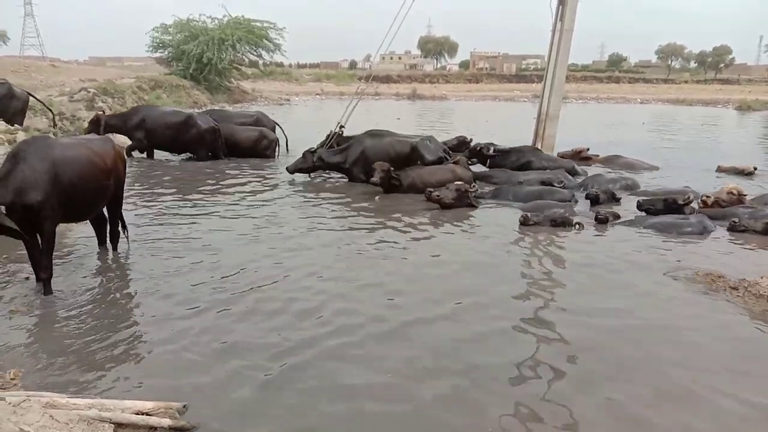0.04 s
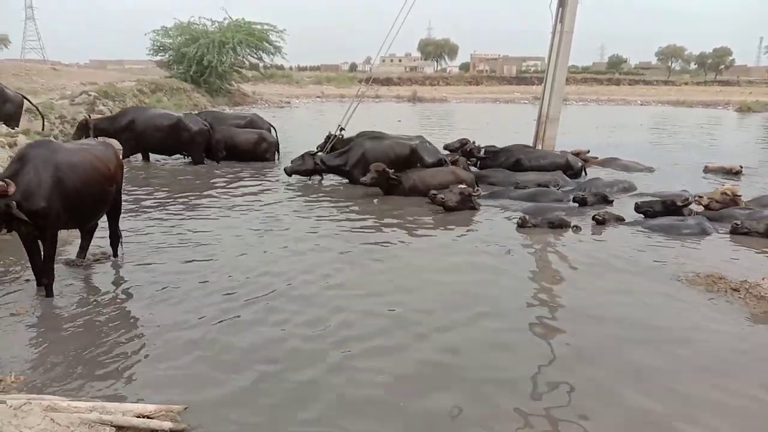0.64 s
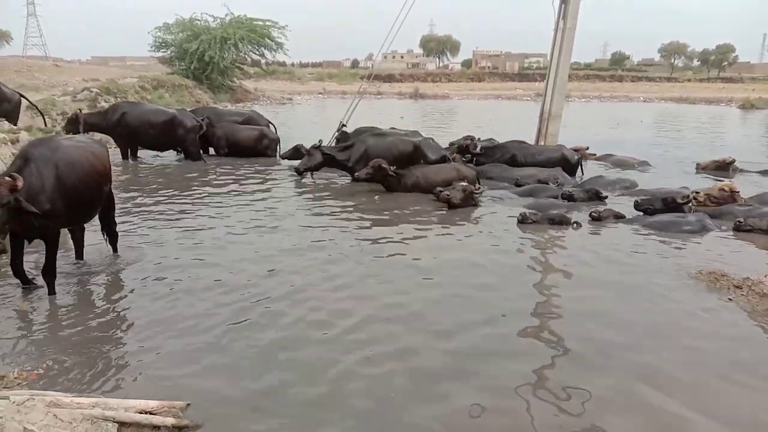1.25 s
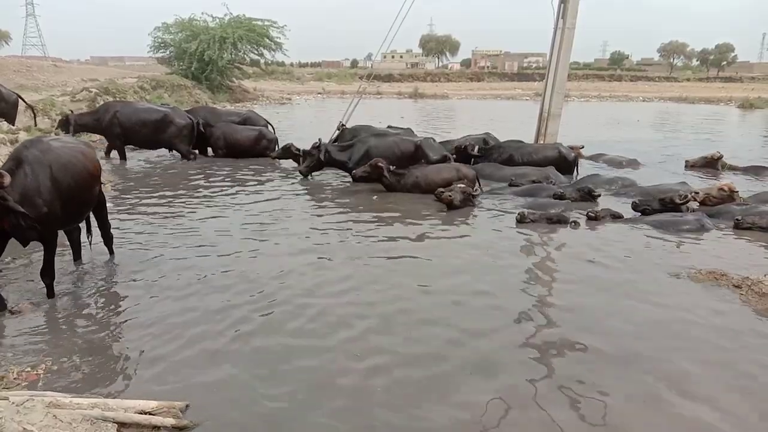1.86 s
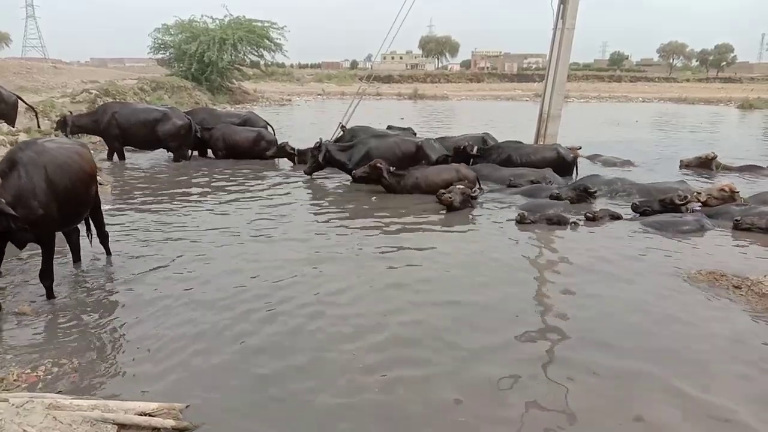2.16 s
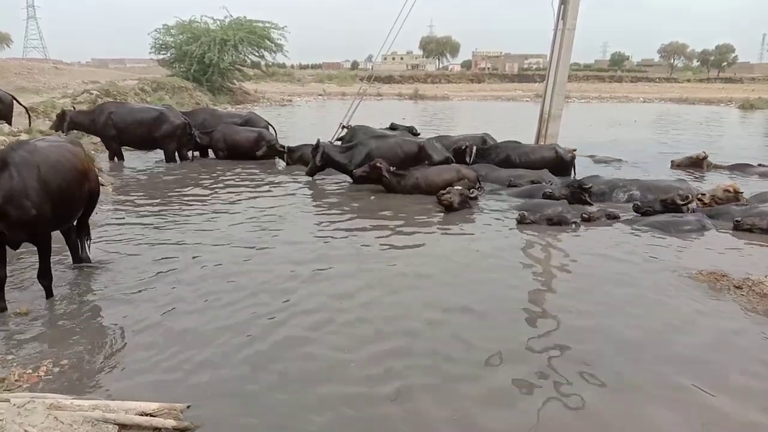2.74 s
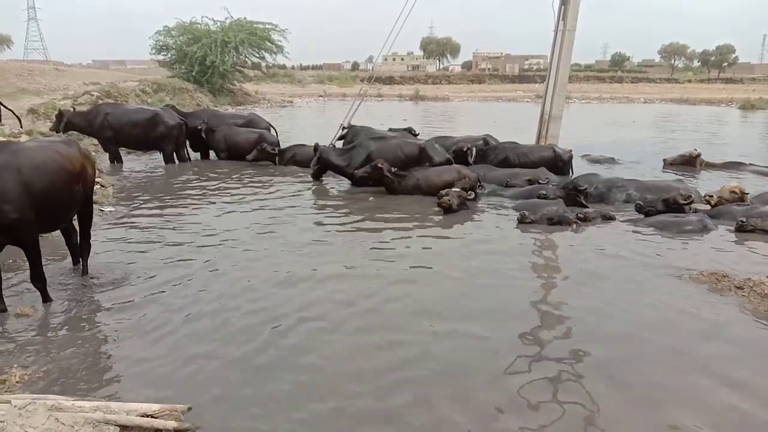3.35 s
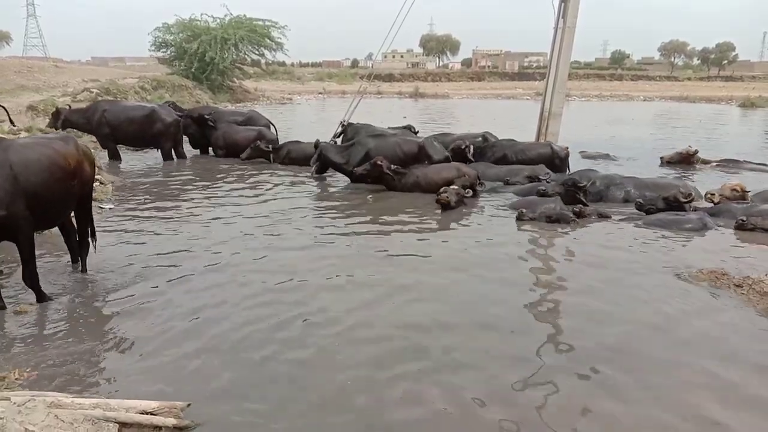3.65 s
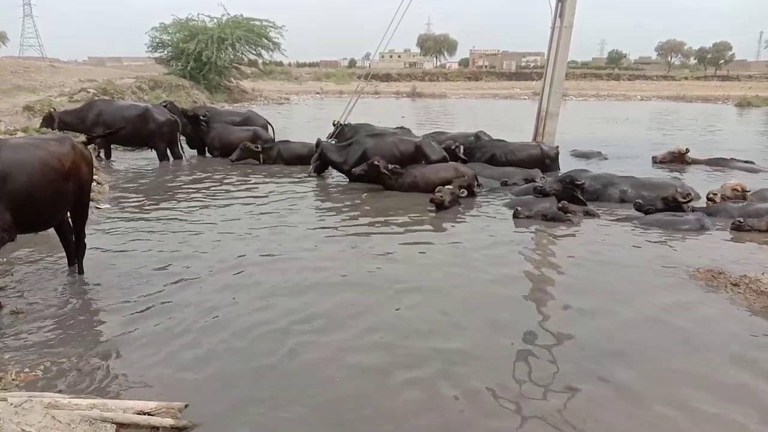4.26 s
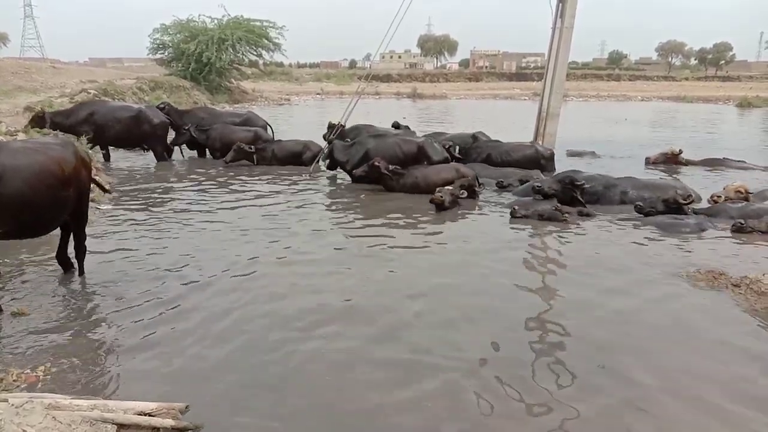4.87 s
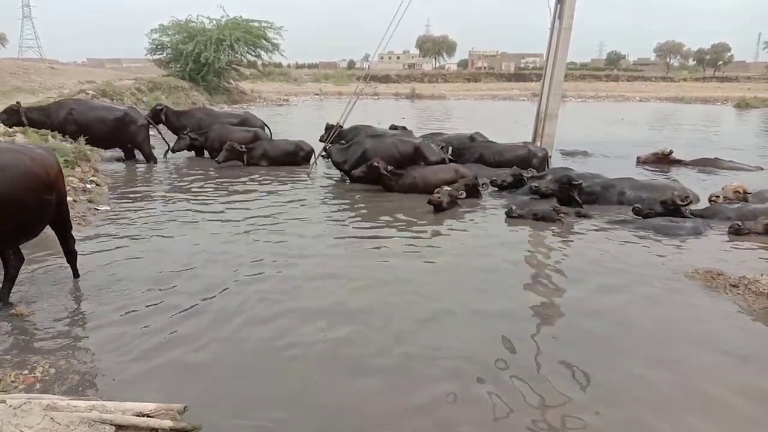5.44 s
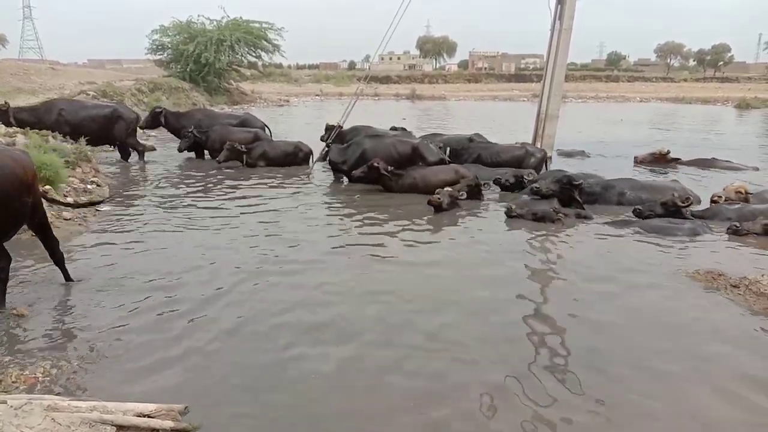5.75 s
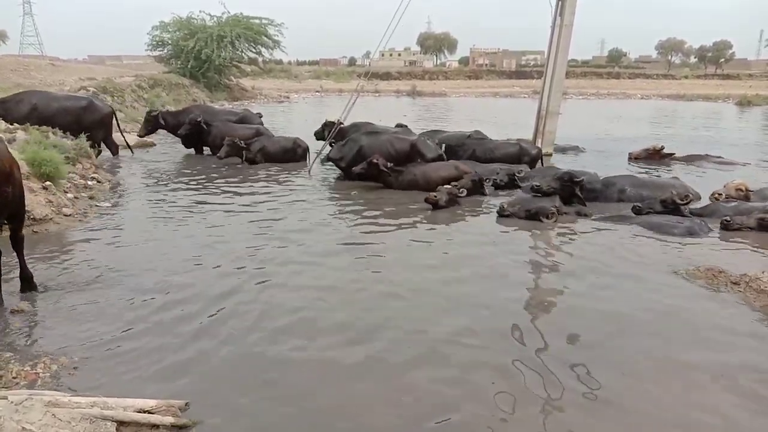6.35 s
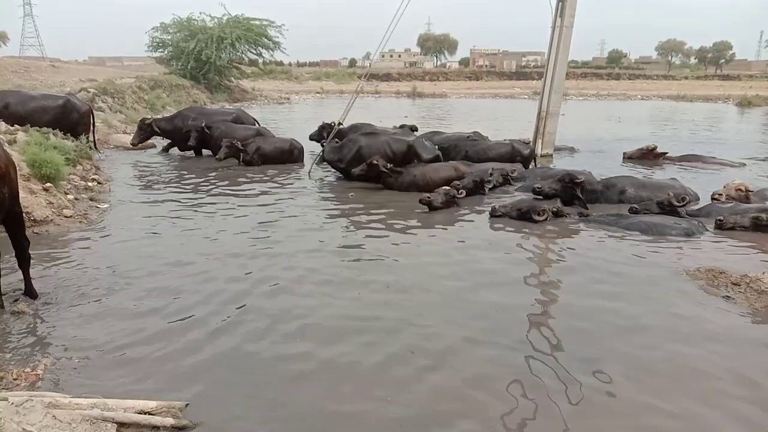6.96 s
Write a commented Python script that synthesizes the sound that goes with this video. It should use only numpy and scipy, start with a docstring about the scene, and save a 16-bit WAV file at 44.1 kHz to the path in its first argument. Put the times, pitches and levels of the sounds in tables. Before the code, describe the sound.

Buffaloes wade in a muddy pond outdoors, their legs making light, irregular sloshes, slaps and bubbly plops, with thrown drops fizzing back, for the whole seven seconds. A bird gives a rising whistle at the very start and again at about 3.1 and 4.7 seconds. Another small bird repeats a quick, high ticking phrase three or four times a second, steadily from about 1.2 seconds to the end. Wind puffs on the microphone at 0.3 seconds, then a long rumbling gust runs from 2.3 to 4.1 seconds, with the loudest low thumps around 3 seconds. A far crow caws once, faintly, at about 3.2 seconds. A sharp splash and plop comes at 4.6 seconds, with a weaker gust just after. From 5 seconds the sloshing gets busier, with deeper plops and only slight wind puffs. The sound is almost mono.

```python
"""Buffaloes wading in a muddy pond.

Legs slosh, slap and plop: large bubbles gurgle, thrown drops fizz. Gusts buffet the microphone.
One small bird repeats a quick ticking phrase, another gives rising whistles, a far crow caws once.
The microphone's port rings near 1250 Hz; the sound is almost mono."""
import sys
import numpy as np
from scipy import signal
from scipy.fft import rfft, irfft, next_fast_len
from scipy.io import wavfile
from scipy.ndimage import uniform_filter1d

SR = 44100
rng = np.random.default_rng(int(sys.argv[2]) if len(sys.argv) > 2 else 0)


def wrap_up_sound(samples):
    """Save the sound to the file named by the first command line argument, as 16-bit audio."""
    columns = np.atleast_2d(samples).T
    # keep every value between -1 and 1, then stretch to whole-number steps
    tamed = np.clip(columns, -1, 1)
    steps = np.round(tamed * 32767).astype(np.int16)
    wavfile.write(sys.argv[1], SR, steps)


N = 313551
TIME_S = np.arange(N) / SR
COARSE_S = TIME_S[::32]  # clock for slow envelopes


def amp(db):
    """Decibels to gain."""
    return 10 ** (np.asarray(db) / 20)


def unit(x):
    """Scale to rms 1."""
    return x / np.sqrt(np.mean(x ** 2) + 1e-20)


def gain_at(spectrum, hz):
    """Gain from (Hz, dB) points joined on a log-frequency axis."""
    points_hz, db = np.transpose(spectrum)
    return amp(np.interp(np.log(hz + 1), np.log(points_hz + 1), db))


def add(mix, start_s, sound):
    """Mix a sound in at start_s."""
    start = round(start_s * SR)
    sound = sound[max(-start, 0):]
    part = mix[max(start, 0):][:len(sound)]
    part += sound[:len(part)]


def colour(x, spectrum, size=4096):
    """Minimum-phase filter from (Hz, dB) points."""
    log_gain = np.log(gain_at(spectrum, abs(np.fft.fftfreq(size, 1 / SR))))
    taps = np.fft.ifft(np.exp(np.conj(signal.hilbert(log_gain)))).real
    return signal.oaconvolve(x, taps[:size // 2])[:len(x)]


def band_rms(x, lo_hz, hi_hz):
    """Rms within one band."""
    return np.std(signal.sosfilt(signal.butter(3, [lo_hz, hi_hz], "band", fs=SR, output="sos"), x))


def wander(rate_hz, count=N):
    """Smooth noise of rms about 1, rolling off above rate_hz."""
    size = next_fast_len(N, True)
    lowpass = np.exp(-(np.fft.rfftfreq(size, 1 / SR) / rate_hz) ** 2)
    return unit(irfft(rfft(rng.standard_normal(size)) * lowpass, size))[:count]


def patchy(x, depth_db, span_s, span_hz):
    """Random gain patches in time and frequency."""
    spectrogram = signal.stft(x, nperseg=512, noverlap=384)[2]
    patches = rng.standard_normal(spectrogram.shape)
    for axis, span in enumerate([span_hz * 512 / SR, span_s * SR / 128]):
        kernel = np.hanning(max(round(2 * span), 3))
        patches = signal.fftconvolve(patches, np.expand_dims(kernel, 1 - axis), "same")
    return signal.istft(spectrogram * amp(depth_db * unit(patches)), nperseg=512, noverlap=384)[1][:N]


def surge(peak_s, rise_s, fall_s):
    """Coarse envelope, 10 dB down at rise_s before and fall_s after its peak."""
    t = COARSE_S - peak_s
    return amp(-10 * np.where(t < 0, (t / rise_s) ** 2, t / fall_s).clip(0, 20))


def power_sum(floor_db, surges):
    """Audio-rate envelope of overlapping surges on a steady floor."""
    return np.interp(TIME_S, COARSE_S, np.sqrt(amp(floor_db) ** 2 + np.sum(np.square(surges), axis=0)))


def scatter(x, t60_s, wet_db):
    """Add sparse echoes off the banks, herd and bushes."""
    t = np.arange(SR // 2) / SR
    taps = rng.standard_normal(len(t)) * (rng.random(len(t)) < 1500 / SR)  # 1500 echoes a second
    taps *= (t > .005) * np.exp(-np.log(1000) * t / t60_s)
    return x + amp(wet_db) * signal.oaconvolve(x, taps / np.linalg.norm(taps))[:N]


def hiss():
    """Each channel's own faint noise."""
    # Each row: frequency in Hz, gain in dB.
    spectrum = [(30, -68.5), (100, -64), (300, -64.5), (1200, -69), (5000, -73.5), (15000, -69.5)]
    return np.array([colour(noise, spectrum) for noise in rng.standard_normal((2, N))])


def air():
    """Faint wash of open country."""
    # Each row: frequency in Hz, relative level in dB.
    spectrum = [(30, -6), (100, 6), (300, 1), (550, -23.5), (900, -10), (2000, -4.5), (3000, -19),
                (4200, -18), (5000, 2.5), (6500, -15), (10000, -9), (15000, -8)]
    wash = patchy(colour(rng.standard_normal(N), spectrum), depth_db=1.6, span_s=.05, span_hz=400)
    return amp(-63.5) * unit(wash)


def crow():
    """One hoarse harmonic caw; the pitch arches and drops."""
    # Each row: time in seconds, pitch in Hz, level in dB.
    caw = [(3.13, 587, -86), (3.169, 599, -59), (3.20, 620, -52), (3.249, 595, -53), (3.278, 569, -56),
           (3.32, 506, -58), (3.35, 487, -68)]
    # Each row: frequency in Hz, gain in dB.
    throat = [(550, -36), (1150, -0.5), (1850, 1.5), (2400, 3), (3000, -43), (4000, -37)]
    times_s, hz, db = np.transpose(caw)
    pitch_hz = np.interp(TIME_S, times_s, hz)
    phase = 2 * np.pi * np.cumsum(pitch_hz * (1 + .04 * wander(260))) / SR
    voice = sum(gain_at(throat, k * pitch_hz) * np.sin(k * phase) * (1 + .5 * wander(130))
                for k in range(1, 7))
    return voice * amp(np.interp(TIME_S, times_s, db)) * (TIME_S > times_s[0]) * (TIME_S < times_s[-1])


def whistle(times_s, hz, db):
    """Quivering pure tone along a pitch and level path."""
    t = np.arange(times_s[0], times_s[-1], 1 / SR)
    pitch_hz = np.interp(t, times_s, hz) * (1 + .0055 * wander(300, count=len(t)))
    envelope = amp(np.interp(t, times_s, db)) * signal.windows.tukey(len(t), .05)
    return envelope * np.sin(2 * np.pi * np.cumsum(pitch_hz) / SR)


def note(length_s, start_hz, end_hz):
    """Short, slightly raspy glide."""
    pitch_hz = np.linspace(start_hz, end_hz, int(length_s * SR))
    rasp = .018 * unit(uniform_filter1d(rng.standard_normal(SR // 8), 50))[:len(pitch_hz)]
    return np.sin(2 * np.pi * np.cumsum(pitch_hz * (1 + rasp)) / SR) * np.hanning(len(pitch_hz))


def bird_calls(echo_s=.075, echo_db=-21):
    """Rising whistles echoed by the far bank, one thin call and stray chirps."""
    # Each row: top of the sweep in seconds, level in dB, time stretch.
    whistles = [(.113, -40.5, 0.94), (3.111, -42, 1.0), (4.753, -41, 1.02)]
    # Each row: offset from the top in seconds, pitch in Hz, relative level in dB.
    upsweep = [(-.15, 3090, -17), (-.128, 3730, -2), (-.108, 4220, -1.5), (-.075, 4380, -1.5),
               (-.04, 4600, 5.5), (-.02, 4980, 7), (-.004, 5550, 5.5), (.004, 5760, -22.5)]
    # Each row: time in seconds, pitch in Hz, level in dB.
    thin_call = [(2.576, 5970, -48), (2.590, 7160, -44), (2.601, 7170, -41.5), (2.615, 6820, -48),
                 (2.635, 6450, -44.5), (2.655, 6540, -61)]
    # Each row: start and length in seconds, start and end pitch in Hz, level in dB.
    chirps = [(0.43, 0.053, 7000, 6950, -67), (0.81, 0.066, 7370, 7380, -49),
              (1.028, .045, 7400, 7250, -66), (1.166, 0.045, 7100, 6840, -66),
              (1.405, 0.098, 7100, 7100, -61), (1.718, 0.091, 6980, 7000, -62),
              (2.331, 0.046, 7340, 7050, -63), (2.886, 0.038, 5000, 5460, -44.5),
              (2.909, 0.039, 4330, 4970, -43.5), (4.523, 0.031, 4960, 5550, -46),
              (4.55, 0.034, 4150, 5170, -42.5)]
    out = np.zeros(N)
    offsets_s, hz, shape_db = np.transpose(upsweep)
    for top_s, db, stretch in whistles:
        times_s = top_s + offsets_s * stretch
        call = whistle(times_s, hz, db + shape_db)
        add(out, times_s[0], call)
        add(out, times_s[0] + echo_s, amp(echo_db) * call)
    add(out, thin_call[0][0], whistle(*np.transpose(thin_call)))
    for start_s, length_s, start_hz, end_hz, db in chirps:
        add(out, start_s, amp(db) * note(length_s, start_hz, end_hz))
    return out


def ticking_bird(period_s=.2805, spread_db=1.5):
    """One quick phrase, repeated in bouts."""
    # Each row: first phrase and end of the bout in seconds.
    bouts = [(.235, .4), (1.166, 7.2)]
    # Each row: time in seconds, level in dB.
    loudness = [(.2, -44), (1.3, -46.5), (2.0, -43), (3.6, -41.5), (4.25, -38.5), (5.1, -43), (6.1, -43.5),
                (7.05, -39)]
    # Each row: centre offset and length in seconds, start and end pitch in Hz, relative level in dB.
    phrase = [(-.083, .006, 4560, 5170, -6), (-.052, .005, 4900, 5600, -13.5),
              (-.030, .011, 4900, 5000, -5.5), (-.018, .009, 4770, 5260, -4), (-.011, .005, 4700, 5600, -3),
              (0, .016, 4450, 4600, -2.5), (0.08, 0.059, 4850, 5044, -16)]
    out = np.zeros(N)
    for phrase_s in np.concatenate([np.arange(first_s, end_s, period_s) for first_s, end_s in bouts]):
        phrase_db = np.interp(phrase_s, *np.transpose(loudness))
        for offset_s, length_s, start_hz, end_hz, note_db in phrase:
            gain = amp(phrase_db + note_db + spread_db * rng.standard_normal())
            add(out, phrase_s + offset_s - length_s / 2, gain * note(length_s, start_hz, end_hz))
    return out


def wind_rush():
    """Soft rush that comes with the long gust."""
    # Each row: frequency in Hz, relative level in dB.
    spectrum = [(150, -1), (300, 0), (450, 5.5), (700, 4.5), (1100, -12), (2000, -9.5), (2800, -24.5),
                (3600, -12), (7500, -19.5), (10000, -12.5), (12500, -36)]
    # Each row: time in seconds, level in dB.
    loudness = [(2.33, -90), (2.41, -78), (2.5, -46.5), (2.75, -49.5), (2.95, -60.5), (3.2, -64),
                (3.38, -49.5), (3.55, -57), (3.75, -53.5), (4.0, -55), (4.15, -71)]
    rush = patchy(colour(rng.standard_normal(N), spectrum), depth_db=2, span_s=.08, span_hz=300)
    return unit(rush) * amp(np.interp(TIME_S, *np.transpose(loudness)))


def buffeting(breeze_db=-69.5):
    """Eddies rumble on the microphone; two gusts and short puffs set their force."""
    # Each row of both: time in seconds, level in dB.
    long_gust = [(2.27, -75), (2.33, -56), (2.39, -37.5), (2.53, -50.5), (2.58, -44.5), (2.72, -54),
                 (2.91, -37.5), (3.01, -26.5), (3.08, -30.5), (3.11, -44), (3.16, -30.5), (3.3, -35),
                 (3.4, -28.5), (3.53, -37), (3.66, -34.5), (3.71, -49), (3.75, -32), (3.88, -39),
                 (3.99, -34.5), (4.06, -43), (4.15, -74)]
    late_gust = [(4.36, -68.5), (4.44, -48), (4.53, -53.5), (4.68, -43.5), (4.735, -53), (4.79, -37.5),
                 (4.865, -41), (4.91, -57.5), (4.97, -61)]
    # Each row: peak time in seconds, level in dB, seconds to rise or fall 10 dB.
    puffs = [(.325, -42, .035), (.61, -60, .03), (1.26, -61, 0.1), (1.78, -48.5, .02), (2.075, -54, .02),
             (2.175, -49, .03), (4.225, -47.5, 0.05), (5.35, -55.5, .06), (5.82, -59, 0.06),
             (6.155, -52.5, 0.07), (6.61, -50, .07), (6.825, -49, .025)]
    # Each row: frequency in Hz, relative level in dB.
    spectrum = [(20, -44.5), (35, -26), (55, -6.5), (80, 3), (130, 0), (180, -9), (260, -18.5), (400, -34),
                (900, -59.5), (3000, -76)]
    gusts = [amp(np.interp(COARSE_S, *np.transpose(gust), left=-np.inf, right=-np.inf))
             for gust in (long_gust, late_gust)]
    gusts += [amp(db) * surge(peak_s, width_s, width_s) for peak_s, db, width_s in puffs]
    eddies = colour(rng.standard_normal(N), spectrum)
    eddies /= np.sqrt(uniform_filter1d(eddies ** 2, 1200) + 1e-12)  # flatten the noise's own swells
    rumble = power_sum(breeze_db, gusts) * eddies * amp(1.3 * wander(22))
    return signal.sosfilt(signal.butter(3, 52, "high", fs=SR, output="sos"), rumble)


def wind_thumps():
    """Hard eddies each push and pull the diaphragm for about one cycle."""
    # Each row: centre in seconds, peak in dB, pitch in Hz.
    eddies = [(0.331, -36, 84.5), (1.778, -42.5, 70), (3.014, -16.5, 125), (3.054, -21, 172),
              (3.077, -24, 145), (3.148, -17.5, 120), (3.753, -25, 84), (4.04, -26.5, 87.5),
              (4.792, -31, 86.2)]
    out, t = np.zeros(N), np.arange(-1000, 1000) / SR
    for centre_s, db, hz in eddies:
        add(out, centre_s + t[0], -amp(db) * np.cos(2 * np.pi * hz * t) * np.exp(-(t * hz / .8) ** 2))
    return out


def bubble(hz, t60_s, rise):
    """An air pocket rings; nearing the surface, its pitch climbs by the fraction rise per t60_s."""
    t = np.arange(int(t60_s * SR) + 2) / SR
    envelope = np.exp(-np.log(1000) * t / t60_s) * (1 - np.exp(-2 * t * hz))
    return envelope * np.sin(2 * np.pi * hz * (t + rise * t ** 2 / t60_s / 2))


def swarm(lo_hz, hi_hz, per_s, t60_cycles, spread_db, sizes=48):
    """Random bubbles of many sizes, a few much stronger than the rest."""
    out = np.zeros(N)
    for hz in np.geomspace(lo_hz, hi_hz, sizes):
        chance = rng.random(N) * SR * sizes / per_s
        ring = bubble(hz, t60_cycles / hz, rise=.11) * hz  # small bubbles ring briefly but hard
        for onset in np.flatnonzero(chance < 1):
            strength = min(-np.log(chance[onset] + 1e-9), 4)
            add(out, onset / SR, amp(spread_db * strength) * ring)
    return unit(out)


def crackles():
    """Short crackling bursts: water slaps, bright drops and a sharp tick."""
    # Each row: start in seconds, level in dB, spectral peak in Hz, t60 in seconds.
    bursts = [(.169, -41.5, 2830, .052), (.382, -44, 1940, 0.11), (.384, -39.5, 4600, 0.054),
              (.562, -37.5, 1430, 0.054), (.599, -42, 9400, .012), (.75, -38, 3980, .052),
              (.838, -48, 605, 0.091), (.985, -41, 2330, 0.096), (1.576, -39, 9300, 0.015),
              (1.823, -44.5, 1660, 0.21), (3.087, -45, 9400, 0.014), (3.651, -35.5, 3000, .02),
              (3.685, -30, 4600, 0.029), (3.909, -35.5, 1510, 0.017), (3.951, -43, 2500, .027),
              (3.992, -41, 1730, 0.1), (4.217, -39.5, 9460, .043), (4.407, -46.5, 1900, .087),
              (4.5819, -40, 2050, .021), (4.5847, -29.5, 4200, .03), (4.590, -28, 9100, 0.015),
              (4.757, -39, 9400, 0.017), (4.921, -41, 7000, 0.027), (4.942, -45, 1410, .13),
              (5.32, -41.5, 2030, .093), (5.342, -37, 9400, 0.027), (5.438, -33, 3500, 0.037),
              (5.572, -40.5, 3500, 0.038), (5.718, -41, 9300, 0.022), (5.746, -40.5, 1880, 0.13),
              (5.924, -31.5, 6900, .025), (6.321, -41.5, 1180, 0.043), (6.587, -48.5, 1230, 0.036),
              (6.649, -42.5, 1130, .074), (6.891, -38, 1830, .016), (6.939, -35, 2540, .036)]
    out, t = np.zeros(N), np.arange(SR // 4) / SR
    for start_s, db, hz, t60_s in bursts:
        envelope = np.exp(-np.log(1000) * t / t60_s) * (1 - np.exp(-t / .0006))
        crackle = rng.standard_normal(len(t))
        crackle *= amp(1.2 * unit(uniform_filter1d(rng.standard_normal(len(t)), 60)))
        spectrum = [(hz / 8, -36), (hz / 2, -14), (hz / .91, -2), (hz, 0), (hz * 1.12, -9), (hz * 5, -23)]
        burst = colour(crackle * envelope, spectrum)
        add(out, start_s, amp(db) * burst * np.linalg.norm(envelope) / np.linalg.norm(burst))
    return out


def plops():
    """Air pockets close behind a leg and ring as big bubbles."""
    # Each row: start in seconds, level in dB, pitch in Hz, t60 in seconds.
    pockets = [(.224, -42, 1186, .035), (.468, -38.5, 222, 0.045), (.562, -30, 2020, 0.022),
               (.578, -33.5, 764, .04), (.598, -38.5, 227, 0.094), (.842, -35.5, 476, .039),
               (1.59, -47, 671, 0.18), (1.883, -39.5, 470, .025), (2.037, -33.5, 1006, .027),
               (2.057, -34, 780, .028), (2.232, -45, 750, .043), (2.293, -35.5, 1045, .03),
               (4.584, -26, 1860, .021), (4.690, -44.5, 767, 0.086), (5.100, -40.5, 417, 0.066),
               (5.300, -41, 284, 0.35), (5.360, -34, 254, 0.065), (5.871, -35, 597, 0.039),
               (5.940, -39, 820, 0.064), (5.953, -38.5, 1118, .087), (5.985, -45, 516, .09),
               (6.145, -42.5, 185, .14), (6.318, -39.5, 940, .048), (6.545, -43.5, 153.7, .52),
               (6.625, -31.5, 307, 0.029), (6.891, -34, 1510, 0.017), (6.975, -37, 933, 0.031)]
    out = np.zeros(N)
    for start_s, db, hz, t60_s in pockets:
        add(out, start_s, amp(db) * bubble(hz, t60_s, rise=.092))
    return out


def wading(lapping_db=-76.5, dripping_db=-76.5):
    """Leg strokes push the water: large bubbles gurgle, thrown drops fizz back in clumps."""
    # Each row: peak time, 10 dB rise and 10 dB fall in seconds, slosh and spray levels in dB.
    strokes = [(0.04, 0, 0.25, -60.0, -68), (0.174, 0.15, 0.35, -56, -63.0),
               (0.386, 0.01, 0.05, -49.5, -55.5), (0.573, 0.17, 0.1, -54.5, -64.5),
               (0.752, 0.16, 0.24, -56.0, -53.0), (0.838, 0.17, 0.34, -56.0, -60.0),
               (1.27, -0.1, 0.8, -67.5, -68.5), (1.6, 0.15, 0.23, -54, -59.5),
               (1.853, 0.08, 0.56, -61.0, -72.5), (2.051, 0.12, 0.14, -62.5, -65.0),
               (2.278, 0.24, 0.1, -77.5, -67), (2.45, 0.06, 0.24, -56, -54), (2.86, 0.1, 0.1, -53.5, -63),
               (2.922, 0.05, 0.08, -80, -54.5), (3.305, 0.05, 0.09, -67, -56), (3.4, 0.12, 0.08, -54, -73),
               (3.683, 0.07, 0.11, -76.0, -55), (3.847, 0.16, 0.08, -58.0, -65.5),
               (3.999, 0.15, 0.13, -64.5, -59.5), (4.463, 0.08, 0.05, -55.5, -58),
               (4.595, 0.05, 0.07, -82, -55), (4.716, 0.032, 0.16, -62, -58),
               (5.067, 0.05, 0.22, -56.5, -61), (5.372, 0.155, 0.21, -50.0, -50.5),
               (5.598, 0.26, 0.18, -58.5, -56.5), (5.76, 0.08, 0.13, -77, -59),
               (6.017, 0.13, 0.04, -51.0, -58), (6.154, 0.14, 0.11, -56.5, -57),
               (6.339, 0.214, 0.08, -51.5, -55), (6.677, 0.109, 0.14, -54.5, -61.0),
               (6.983, 0.149, 0.1, -59.0, -56.5), (7.108, 0.04, 0.15, -64.0, -52.0)]
    # Each row of both: frequency in Hz, relative level in dB.
    slosh_spectrum = [(60, -51.5), (150, 11), (300, -9.5), (470, 1), (700, -0.5), (1100, -1), (1900, -10.5),
                      (2700, -34.5), (6000, -28.5)]
    spray_spectrum = [(500, -32), (1200, 2.5), (2000, 5.5), (3000, 1.5), (4000, 2.5), (5500, -1.5),
                      (7500, 1), (15000, -7.5)]
    slosh = power_sum(lapping_db, [amp(db) * surge(*timing_s) for *timing_s, db, _ in strokes])
    spray = power_sum(dripping_db, [amp(db) * surge(*timing_s) for *timing_s, _, db in strokes])
    gurgle = swarm(220, 2600, per_s=520, t60_cycles=34, spread_db=2.8) + .35 * rng.standard_normal(N)
    gurgle = colour(gurgle * amp(wander(25)), slosh_spectrum)
    drops = swarm(1300, 6300, per_s=1300, t60_cycles=48, spread_db=3) + rng.standard_normal(N)
    drops = colour(drops * amp(1.3 * wander(60)), spray_spectrum)
    drops = patchy(drops, depth_db=2.6, span_s=.05, span_hz=450)
    return slosh * gurgle / band_rms(gurgle, 400, 1080) + spray * drops / band_rms(drops, 2300, 3600)


def scene():
    """Pond, birds and wind, nearly alike in both channels, over separate hiss."""
    foreground = scatter(wading() + crackles() + plops(), t60_s=.16, wet_db=-9)
    birds = scatter(bird_calls() + ticking_bird() + crow(), t60_s=.18, wet_db=-7.5)
    field = foreground + birds + air()
    width = amp(-41.5) * np.roll(field, 300) * np.array([[1], [-1]])  # faint antiphase echo
    return hiss() + buffeting() + wind_rush() + wind_thumps() + field + width


def record(dry):
    """Microphone port resonance and dull top, then the band limit."""
    # Each row: frequency in Hz, gain in dB.
    port = [(20, 2), (900, -1.5), (1120, 0.5), (1245, 13), (1400, -1.5), (2000, -4.5), (5600, -1.5),
            (6400, -4.5), (7400, -5.5), (8300, -17), (13500, -18.5), (15100, -9.5), (16000, -15)]
    edge_hz = 15650
    heard = np.array([colour(channel, port) for channel in dry])
    lowpass = signal.firwin(511, edge_hz, window=("kaiser", 9), fs=SR)
    return signal.oaconvolve(heard, lowpass[None], "same")


dry = scene()
out = record(dry)
wrap_up_sound(out)
```